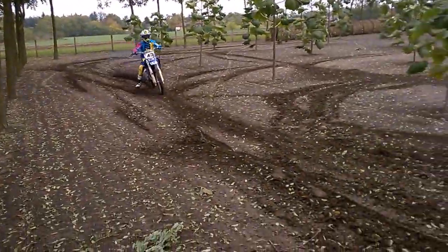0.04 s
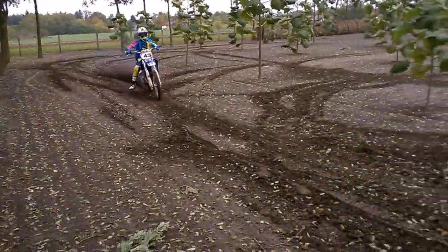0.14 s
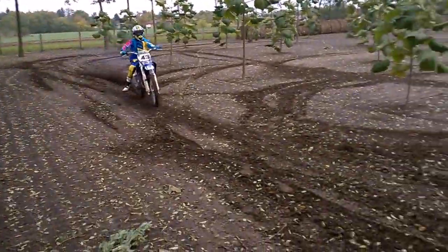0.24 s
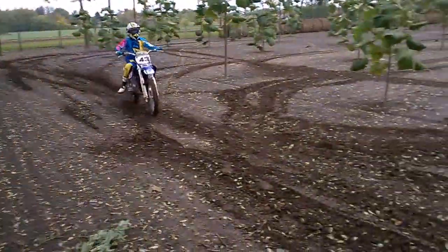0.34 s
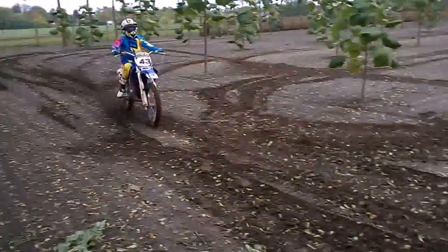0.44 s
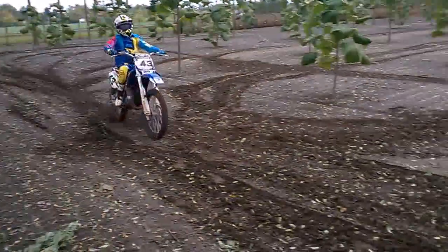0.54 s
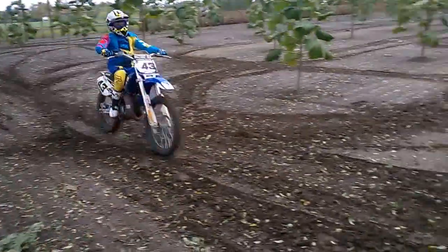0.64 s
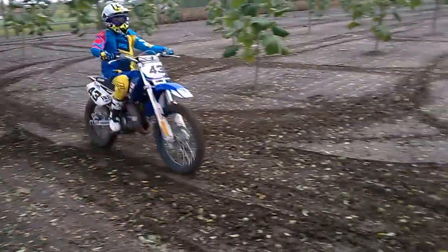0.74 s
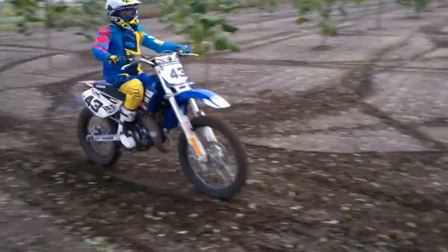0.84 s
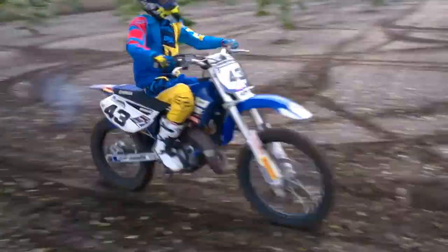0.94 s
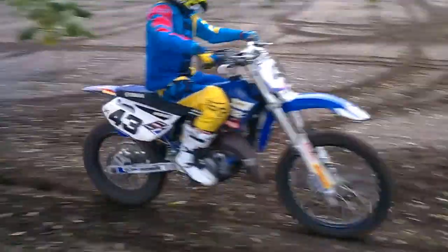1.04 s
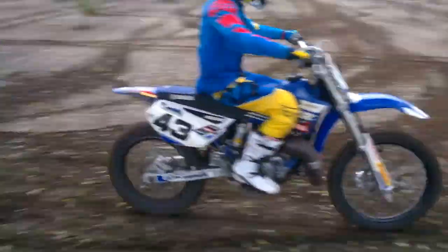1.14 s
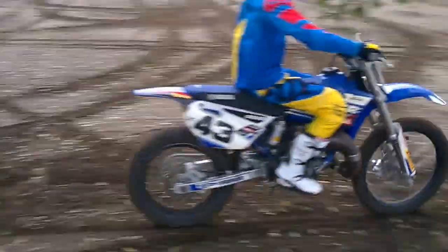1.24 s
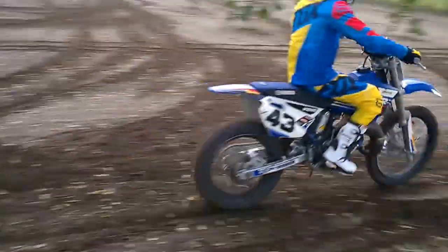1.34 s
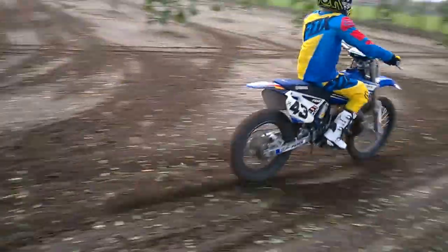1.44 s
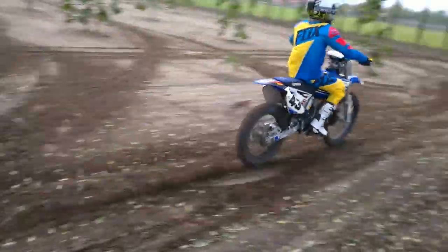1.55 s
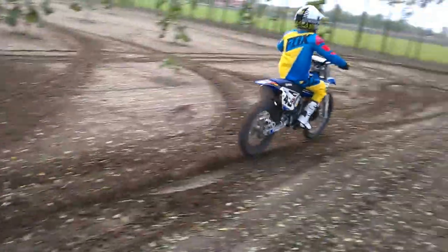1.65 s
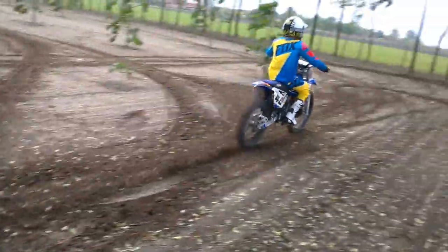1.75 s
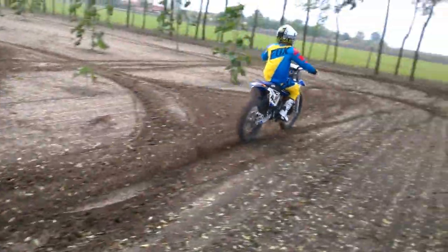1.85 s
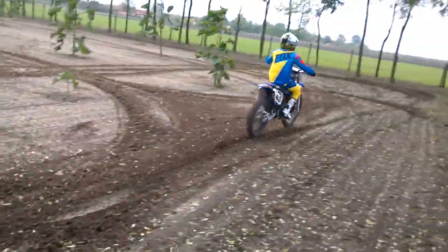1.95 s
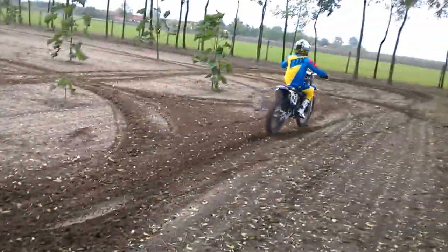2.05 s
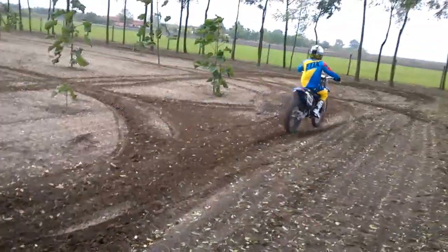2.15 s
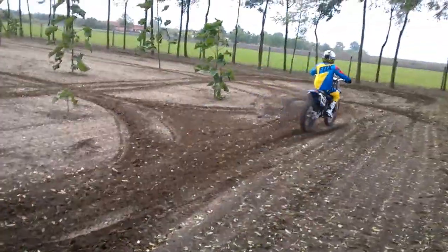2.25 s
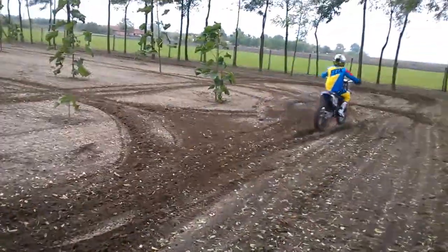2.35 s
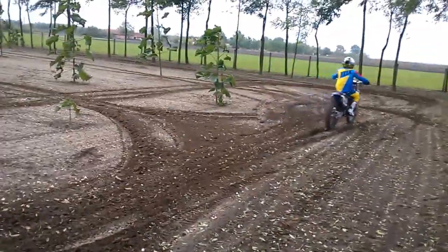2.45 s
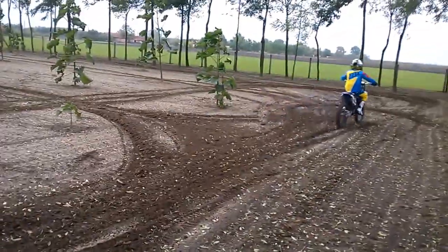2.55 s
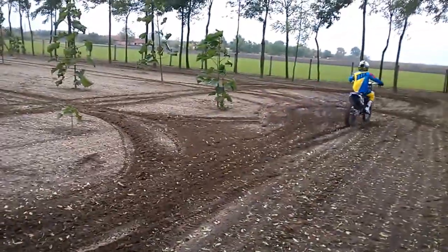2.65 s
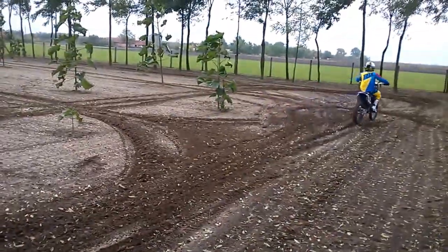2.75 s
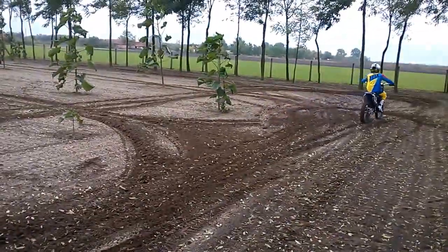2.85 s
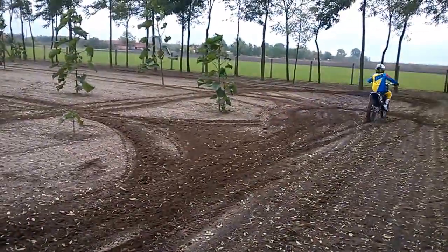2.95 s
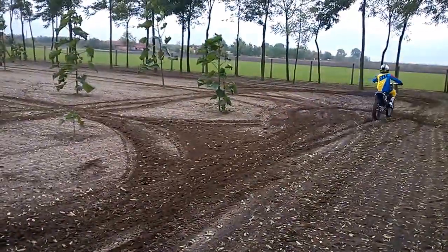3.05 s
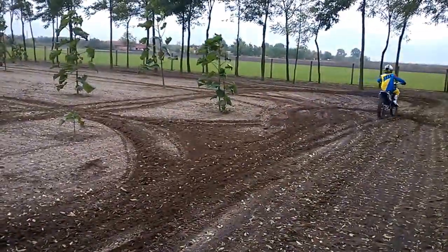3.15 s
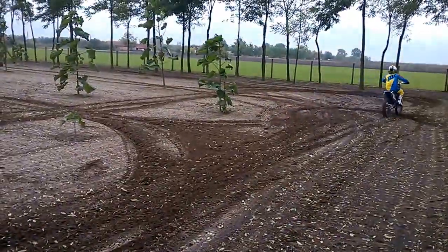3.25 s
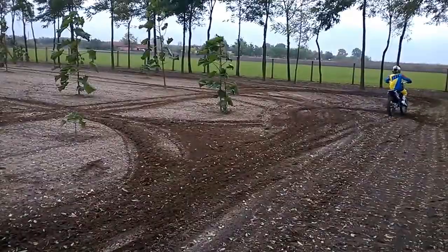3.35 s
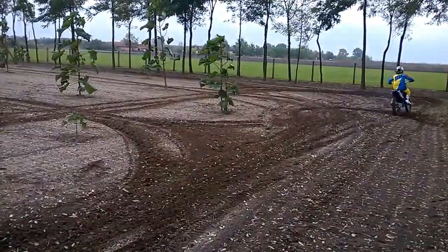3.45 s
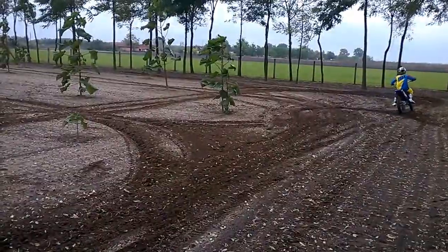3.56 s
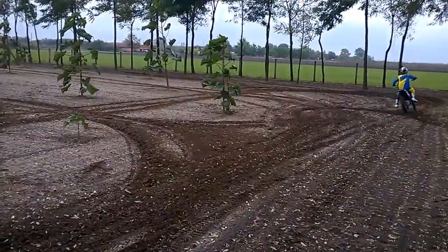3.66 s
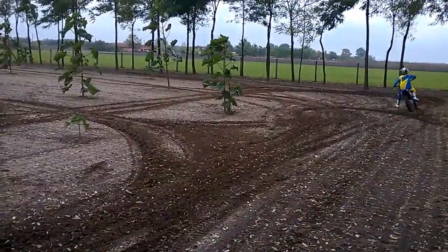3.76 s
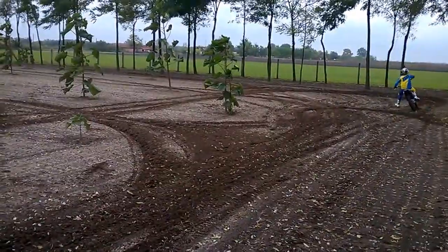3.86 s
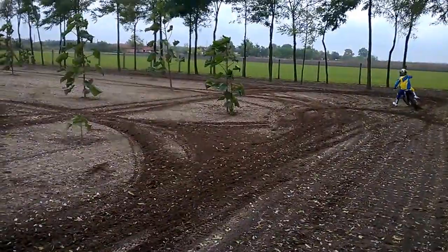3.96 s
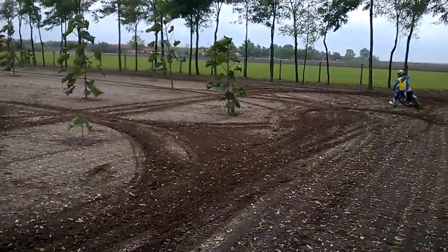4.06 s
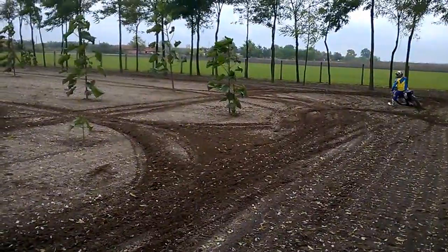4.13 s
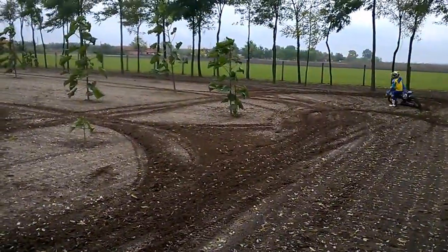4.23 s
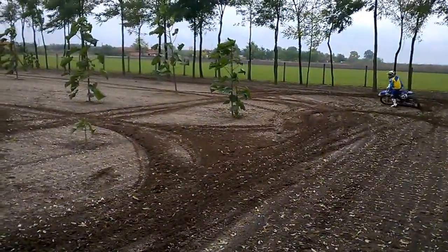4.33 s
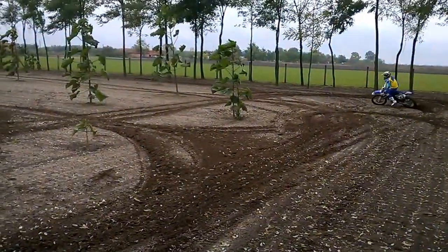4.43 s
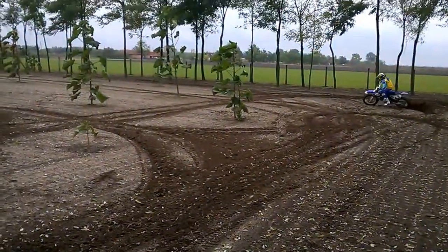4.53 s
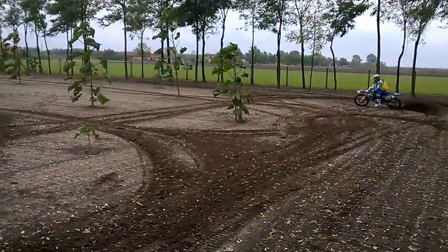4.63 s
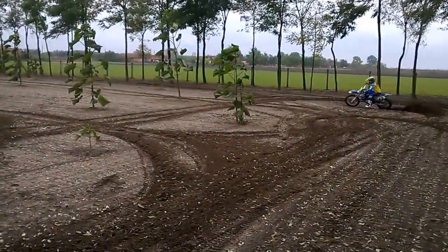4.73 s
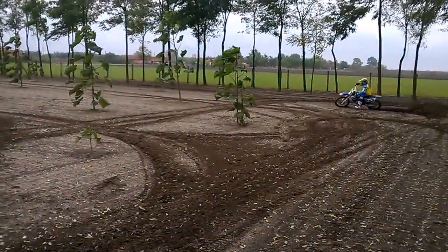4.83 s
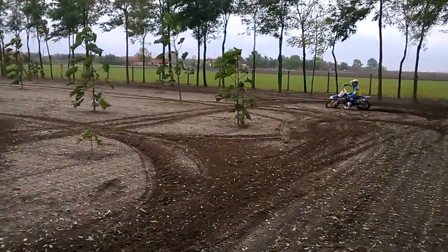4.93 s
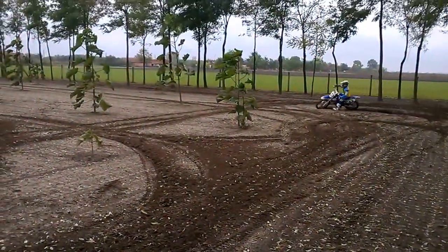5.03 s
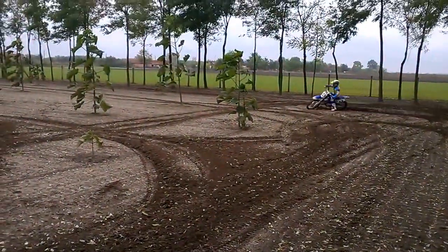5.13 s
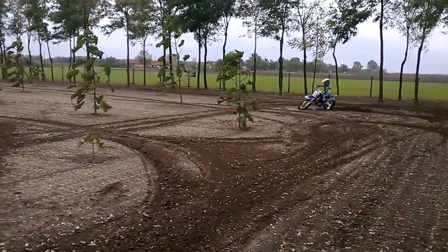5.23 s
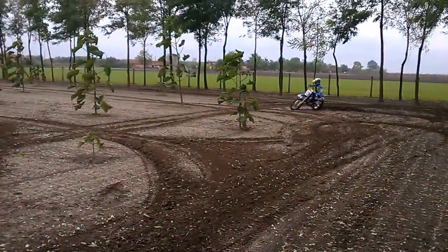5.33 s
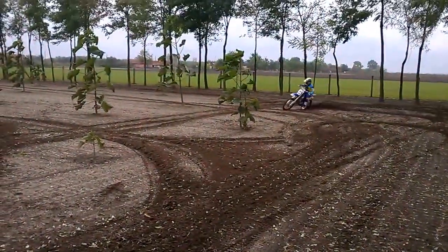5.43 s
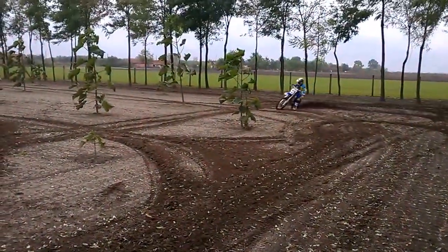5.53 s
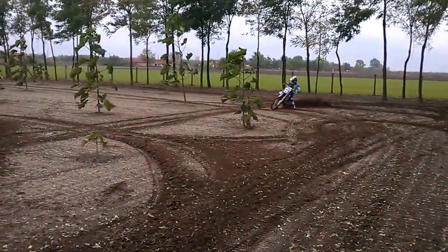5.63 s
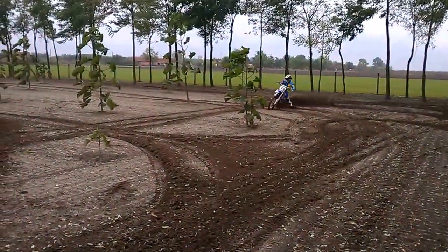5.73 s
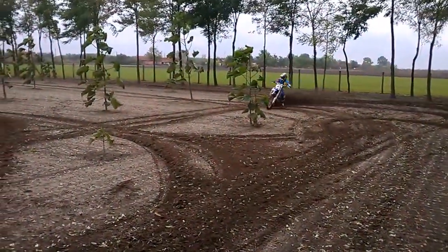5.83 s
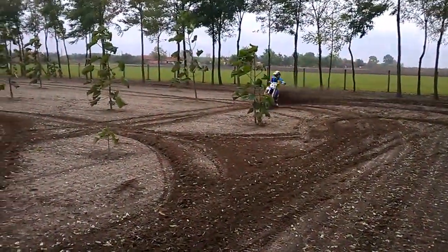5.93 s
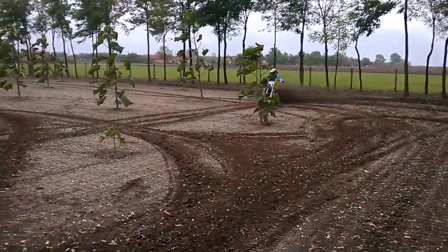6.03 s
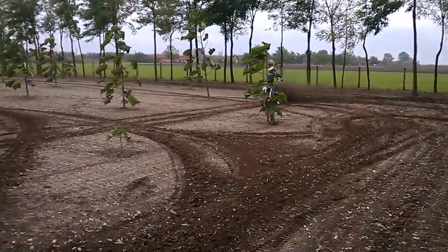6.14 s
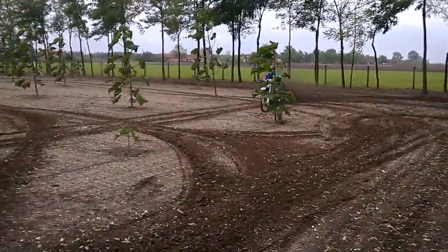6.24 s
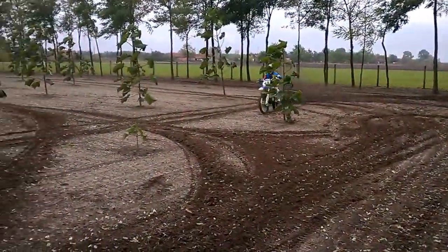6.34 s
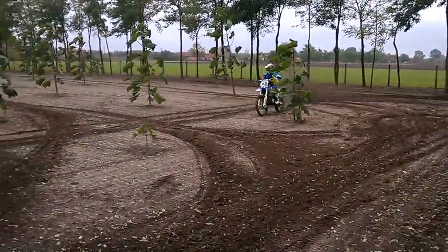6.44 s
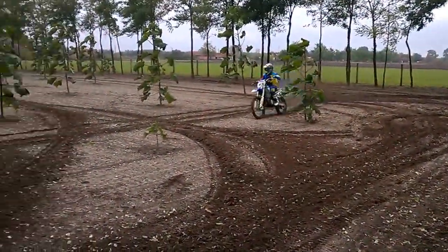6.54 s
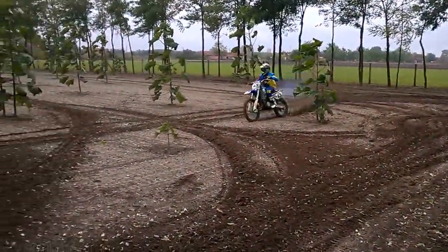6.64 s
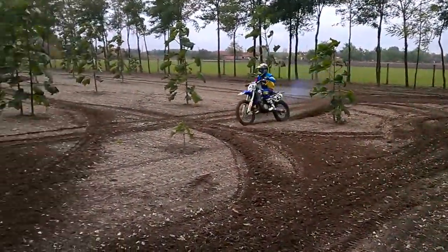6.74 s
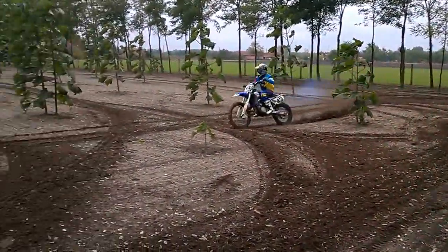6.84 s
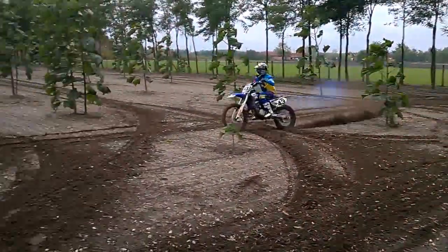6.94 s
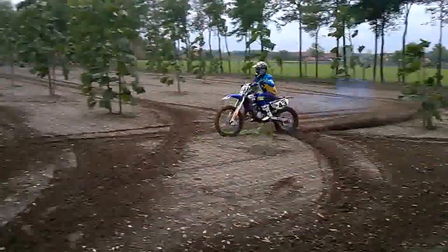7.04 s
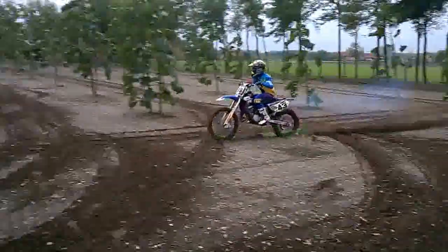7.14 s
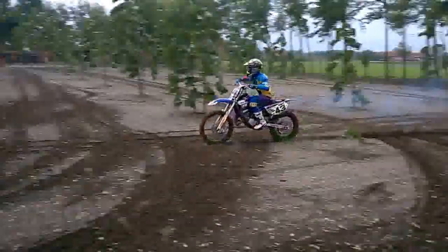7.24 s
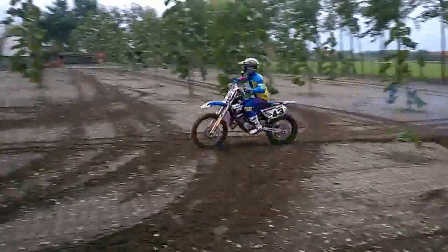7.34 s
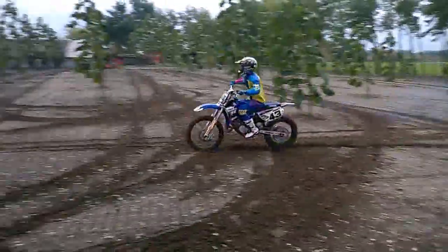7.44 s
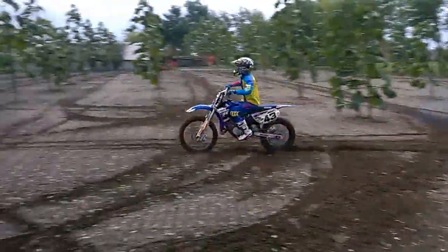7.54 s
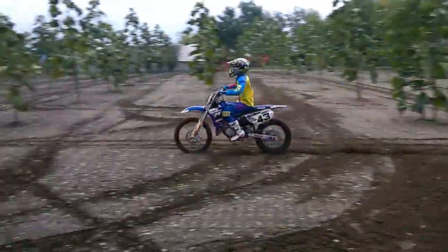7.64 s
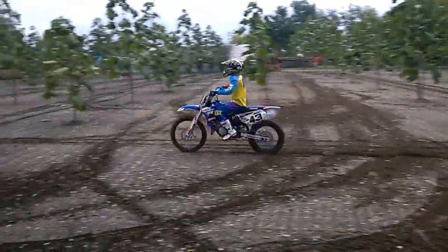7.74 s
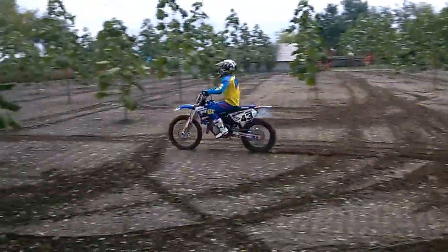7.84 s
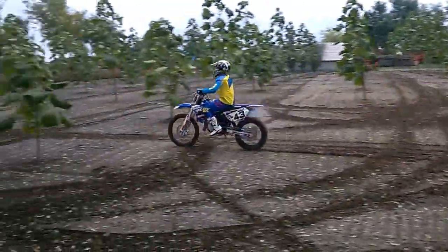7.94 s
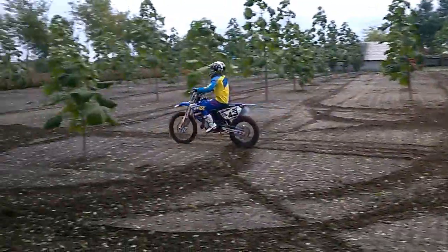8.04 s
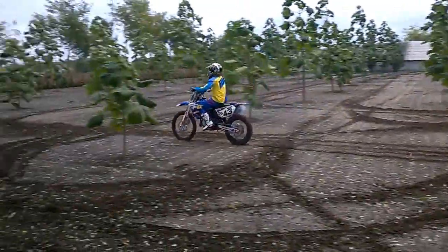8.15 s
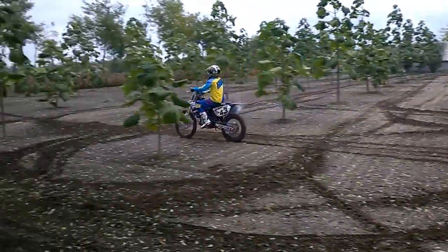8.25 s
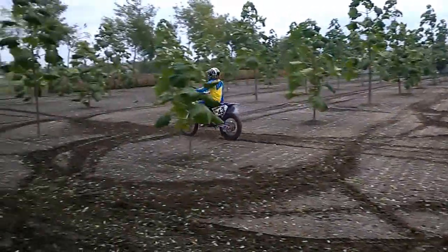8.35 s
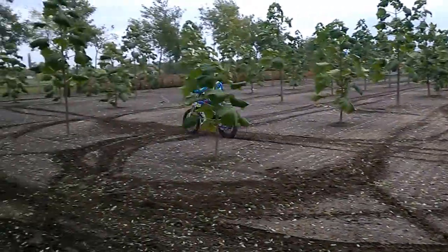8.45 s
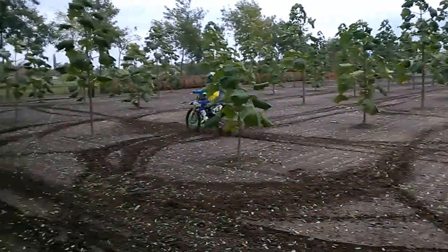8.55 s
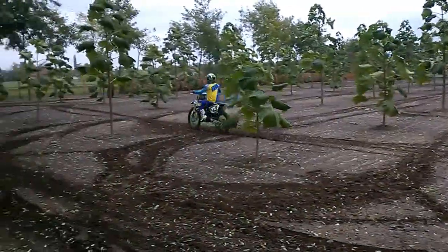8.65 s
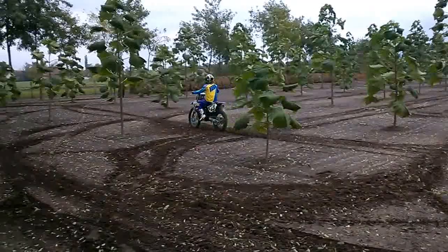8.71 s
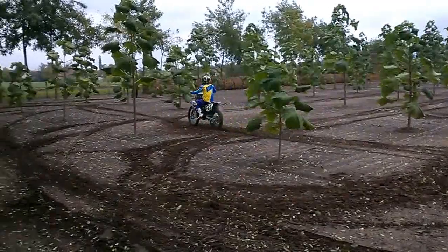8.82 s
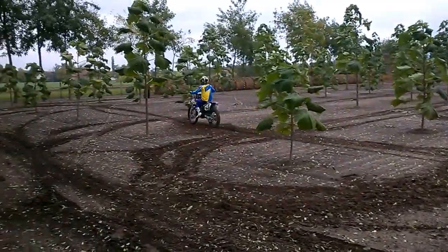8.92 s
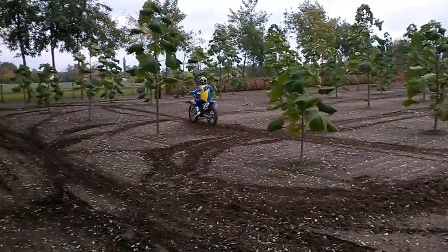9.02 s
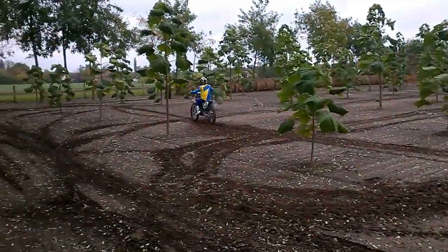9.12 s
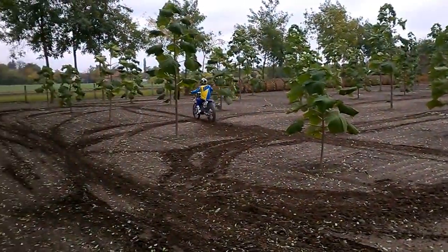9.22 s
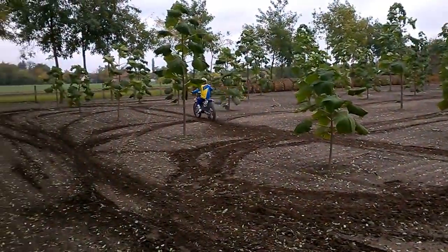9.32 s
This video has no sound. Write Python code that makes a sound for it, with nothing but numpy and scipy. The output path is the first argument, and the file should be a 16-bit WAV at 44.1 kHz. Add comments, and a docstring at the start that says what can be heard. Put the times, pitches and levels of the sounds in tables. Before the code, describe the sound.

A small two-stroke dirt bike screams up, drops its revs and passes close, coasts popping into a far bend, then revs hard and coasts off again, wind thumping.

```python
"""A small two-stroke dirt bike passes close, brakes into a far bend, accelerates back and coasts away among young trees.
One firing per crank turn makes pulses that boom in the tuned pipe and bark from the silencer, with puffs of noise.
Off throttle the engine pumps air, metallic resonances ring, and lone firings pop.
Trunks and ground add a dull scattered tail; wind on the microphone is shaped noise with sharp pressure swings."""
import sys
import numpy as np
from scipy import signal
from scipy.fft import rfft, irfft, next_fast_len
from scipy.io import wavfile
from scipy.ndimage import uniform_filter1d, map_coordinates

SR = 44100
rng = np.random.default_rng(int(sys.argv[2]) if len(sys.argv) > 2 else 0)


def transcribe(u):
    """Save the signal u as a 16-bit wav file named by the first command-line argument.

    u: samples, shape (n,) or (channels, n), limited to [-1, 1]; the rate is SR.
    q: integer samples, one column per channel.
    """
    v = np.clip(np.atleast_2d(u).T, -1, 1)
    q = np.round(v * 32767).astype(np.int16)
    wavfile.write(sys.argv[1], SR, q)


N = 413658


def amp(db):
    """Level in decibels to linear amplitude ratio."""
    return 10 ** (np.asarray(db) / 20)


def even(x, span=0.11):
    """Level normalization: divide by a running rms over about span seconds, smoothed twice."""
    size = int(span * SR)
    power = uniform_filter1d(uniform_filter1d(x * x, size), size)
    return x / np.sqrt(np.abs(power) + 1e-20)


def along(points, hz):
    """Interpolation of (frequency_hz, value) points on a logarithmic frequency axis."""
    f, v = np.transpose(points)
    return np.interp(np.log(hz + 1), np.log(f + 1), v)


def curves(rows):
    """Linear interpolation in time: one sample-rate curve for each column after the time."""
    s, *cols = np.transpose(rows)
    return [np.interp(np.arange(N) / SR, s, c) for c in cols]


def wobble(rate):
    """Band-limited random fluctuation: a smooth curve through rate random knots a second."""
    knots = rng.standard_normal(int(N * rate / SR) + 4)
    return map_coordinates(knots, [np.arange(N) * rate / SR])


def swells(rows):
    """Superposition of Gaussian humps given as (centre_s, half_length_s, height)."""
    t = np.arange(N) / SR
    return sum(height * np.exp(-((t - s) / half_s) ** 2) for s, half_s, height in rows)


def filtered(x, response):
    """Linear filtering: multiply the spectrum by a response given as a function of frequency."""
    m = next_fast_len(N + SR // 2)
    return irfft(rfft(x, m) * response(np.fft.rfftfreq(m, 1 / SR)), m)[:N]


def ringing(x, modes, low_hz, high_hz):
    """Modal superposition: causal second-order resonances of alternating sign inside a steep band."""
    def body(f):
        total = 0
        for k, (centre, width, db) in enumerate(modes):
            resonance = 1j * f * width / (centre * centre - f * f + 1j * f * width)
            total = total + (-1) ** k * amp(db) * resonance
        return total

    band = signal.butter(3, [low_hz, high_hz], "bandpass", fs=SR, output="sos")
    return signal.sosfilt(band, filtered(x, body))


def pulses(at, size):
    """Band-limited impulses: windowed sinc functions at fractional sample positions."""
    tap = np.floor(at)[:, None] + np.arange(-7, 9)
    offset = tap - at[:, None]
    shape = np.sinc(offset) * np.cos(np.pi * offset / 16) ** 2
    index = np.clip(tap, 0, N).astype(int)
    return np.bincount(index.ravel(), (shape * size[:, None]).ravel(), N + 1)[:N]


def throttle():
    """Gas-flow transient: each opening ramps up and holds, then cuts fast with a slower exponential remainder."""
    # throttle openings: open_s, shut_s, rise_s, ragged_burning (0-1)
    openings = [(-0.1, 0.181, .02, 0.14), (0.941, 1.021, 0.023, 1), (3.987, 7.268, 0.39, 0.04)]
    shut_s, linger_s, linger_share = 0.011, 0.091, 0.44  # two decay constants and the slow share
    t = np.arange(N) / SR
    gas, ragged = np.zeros((2, N))
    for open_s, close_s, rise_s, rough in openings:
        rise = np.clip((t - open_s) / rise_s, 0, 1) ** 0.41
        after = np.maximum(t - close_s, 0)
        fast, slow = np.exp(-after / shut_s), np.exp(-after / linger_s)
        gas += rise * ((1 - linger_share) * fast + linger_share * slow)
        ragged += rough * rise * fast
    return np.clip([gas, ragged], 0, 1)


def puffs(turns):
    """Turbulence modulated by port flow: noise surges as the port opens, then tails off within the turn."""
    port = 2.8 + np.exp(-(turns % 1) / 1.1)
    return even(port * rng.standard_normal(N))


def mixed(rough, train, turns):
    """Power-conserving mixture of a periodic pulse train and puffs, rough being the noise share."""
    return np.sqrt(1 - rough) * train + np.sqrt(rough) * puffs(turns)


def smeared(x, delay_s):
    """Dispersion: waves running to and fro in the pipe hold each frequency back by its own few milliseconds."""
    knots = rng.uniform(0, delay_s, 160)

    def lag(hz):  # phase lag in cycles: the integral of group delay
        delay = np.interp(hz, np.linspace(0, SR / 2, len(knots)), knots)
        return np.cumsum(delay) * hz[1]

    return filtered(x, lambda hz: np.exp(-2j * np.pi * lag(hz)))


def pipe_tones(steady, db):
    """Tuned-pipe resonance: firing pulses excite a low boom and a group of overtones."""
    # pipe resonances, low and upper: centre_hz, width_hz, relative_level_db
    low_modes = [(218.6, 47, 3), (110, 60, -31)]
    upper_modes = [(373, 466, 5), (447, 82, 11), (550, 30, 3)]
    # brief booms as the bike passes: centre_s, half_length_s, added_db
    boom_humps = [(0.925, 0.033, 28.5), (1.13, 0.063, 16.5)]
    boom = even(ringing(steady, low_modes, low_hz=93.22, high_hz=280))
    overtones = even(ringing(steady, upper_modes, low_hz=300, high_hz=547))
    boom_gain = amp(db["boom"] + swells(boom_humps))
    return boom_gain * boom + amp(db["overtones"] + 1.73 * wobble(13)) * overtones


def case_hum(drive, db):
    """Structural resonance: the engine case hums under the firing pulses and noise."""
    # case resonances: centre_hz, width_hz, relative_level_db
    case_modes = [(648, 31, 0.5), (802, 44, 0), (1230, 610, -3)]
    return amp(db["hum"]) * even(ringing(drive, case_modes, low_hz=530, high_hz=1370))


def silencer_bark(blast, db):
    """Acoustic cavity resonance: one exhaust blast excites the silencer low and its stinger high."""
    # silencer and stinger resonances: centre_hz, width_hz, relative_level_db
    silencer_modes = [(1306, 190, 0), (1613, 227, 3)]
    stinger_modes = [(1986, 397, -0.5), (2600, 820, -7.5)]
    low = amp(db["low"]) * even(ringing(blast, silencer_modes, low_hz=1330, high_hz=1900))
    high = amp(db["high"]) * even(ringing(blast, stinger_modes, low_hz=1647, high_hz=3440))
    return low + high


def fin_rasp(beats, db, turns):
    """Forced vibration: turbulent puffs with a trace of the pulse train rattle the fin resonances."""
    # fin resonances: centre_hz, width_hz, relative_level_db
    fin_modes = [(3140, 950, 1.5), (4390, 1330, 0.5), (5050, 970, 1), (7100, 1100, 1), (6300, 560, -40)]
    drive = 0.043 * beats + puffs(turns)
    return amp(db["rasp"]) * even(ringing(drive, fin_modes, low_hz=2690, high_hz=8140))


def gas_hiss(db, turns):
    """Broadband turbulent radiation: puffs of gas are shaped into a hiss and a higher sizzle."""
    # noise spectra: frequency_hz, relative_level_db (per Hz)
    hiss_spectrum = [(4470, -2.5), (7600, -2), (8190, -5), (9260, -1.5), (10800, -9.5), (14000, -16),
                     (22000, -120)]
    sizzle_spectrum = [(6180, -42), (10500, -11.5), (12700, 0), (13800, -9), (15600, -1.5)]
    hiss = even(filtered(puffs(turns), lambda hz: amp(along(hiss_spectrum, hz))))
    sizzle = even(filtered(puffs(turns), lambda hz: amp(along(sizzle_spectrum, hz))))
    return amp(db["hiss"]) * hiss + amp(db["sizzle"]) * sizzle


def coasting_rings(knocks, controls, turns):
    """Narrow-band resonance: pulses and puffs excite separate rings that stand out as the engine coasts."""
    # ring resonances: centre_hz, width_hz, noise_share (0-1)
    ring_modes = [(598, 37, 0.07), (2906, 180, 0.32), (3800, 430, 0.95), (5340, 210, 0.8),
                  (8200, 1300, 0.66)]
    # level laws, a row a ring: coasting_db, throttle_adds_db, db_per_loudness_db, db_per_speed_octave,
    # share_of_treble_level, ragged_adds_db
    ring_laws = [(-57.5, -19, 0.93, .1, .01, 37), (-67.5, -22, 0.77, .1, 0.49, 26),
                 (-59, -4, 1.206, .1, 0.33, 13), (-65.5, -17.5, 1.37, .1, 0.11, 37),
                 (-78, -32, 0.92, .1, 1.2, 30)]
    # moments when a ring stands out, a list a ring: centre_s, half_length_s, added_db
    ring_humps = [
        [(1.19, .075, 14.5), (1.5, 0.1, 7.5), (1.95, 0.21, 2), (7.95, 0.16, -1)],
        [(1.2, .2, 12), (1.72, .17, 20.5), (2.03, 0.19, 16), (2.8, 0.22, 12)],
        [(0.9, 0.075, 0), (1.14, 0.13, 9)],
        [],
        [(1.45, 0.059, 1)],
    ]
    total = np.zeros(N)
    for law, humps, (hz, width, rough) in zip(ring_laws, ring_humps, ring_modes):
        drive = mixed(np.clip(rough, 0, 1), knocks, turns)
        ring = ringing(drive, [(hz, width, 0)], low_hz=0.682 * hz, high_hz=1.415 * hz)
        total += amp(np.dot(law, controls) + swells(humps)) * even(ring, span=1.0)
    return total


def patchy(x, depth_db):
    """Interference: ground and trunk echoes make patches of the spectrum swell and fade, drawn as a random field."""
    z = signal.stft(x, nperseg=1024)[2]
    field = uniform_filter1d(rng.standard_normal(z.shape), size=4, axis=0)
    field = uniform_filter1d(uniform_filter1d(field, size=9, axis=1), size=5, axis=1)
    return signal.istft(z * amp(depth_db * field / field.std()), nperseg=1024)[1][:N]


def engine():
    """Source-filter principle: each crank turn sends a pulse and a puff through pipe, case, silencer and fins."""
    # mean crank speed: time_s, turns_per_s_hz
    crank_speed = [(0.0, 211.6), (0.15, 216.2), (0.21, 208.6), (0.29, 167.4), (0.36, 148.3), (0.57, 127.3),
                   (0.68, 135), (0.92, 127.3), (1.0, 160), (1.07, 141.5), (1.2, 127.4), (1.41, 111),
                   (1.67, 96.14), (1.9, 89.5), (2.19, 81.54), (2.62, 69.1), (2.95, 69.54), (3.65, 58.84),
                   (3.9, 59.2), (4.13, 70.8), (4.23, 84.7), (4.36, 94.5), (4.46, 108.1), (4.62, 112),
                   (4.73, 108.9), (4.81, 114.7), (4.89, 115.2), (4.95, 109.4), (5.04, 110.7), (5.09, 117.5),
                   (5.22, 121.1), (5.28, 118.2), (5.41, 137.3), (5.56, 191.9), (5.72, 185.1), (5.88, 205.6),
                   (5.95, 200), (6.01, 209.7), (6.22, 206.2), (6.27, 216.8), (6.4, 218.3), (6.8, 218.6),
                   (7.28, 220.2), (7.37, 180), (7.44, 154.9), (7.55, 138.7), (7.76, 122.2), (8.07, 122.2),
                   (8.31, 116), (8.7, 99.5), (9.04, 82.5), (9.38, 70.1)]
    # the bike as it nears, turns and leaves: time_s, loudness_db, treble_over_usual_share_db
    ride = [(0.0, 7, -2), (0.29, 0, 5), (0.55, 4.5, -0.5), (0.86, 10, -1), (1.07, 8.5, 4), (1.17, 13, 0),
            (1.36, 10.5, 0), (1.46, 10.5, 7.5), (1.56, 4.5, 2), (1.91, -1.5, 2.5), (2.06, -4.5, 3),
            (2.24, -6, 2), (2.62, -9, 4.5), (3.32, -8, 6.5), (3.63, -13, 11.5), (3.94, -13, 11.5),
            (4.2, -8.5, 5), (4.49, -5.5, 3), (5.07, -5.5, 3), (5.3, -7.5, 6), (5.5, -2.5, 4), (5.9, 0, 2),
            (6.3, 1, 1), (6.75, 5, 0.5), (7.1, 6.5, 0), (7.27, 7, 1.5), (7.5, 4, 0.5), (7.63, 3.5, 0),
            (8.07, 4, -4), (8.5, -3, 3), (8.9, -6.5, 1.5), (9.38, -9.5, 7.5)]
    # slow drift of three bands: time_s, pipe_overtones_db, case_hum_db, low_bark_db
    drift = [(0.0, -1, 3, -1), (0.3, 4.5, 2.5, 2), (0.73, -3, 2, 2), (1.1, -1, 0, 0), (2.0, -2, 4.5, -5),
             (2.5, -4, -8.5, -12), (3.9, -3.5, 0, -9.5), (4.6, 2, 2.5, -8), (5.35, 5, 3.5, -1.5),
             (5.6, 2.5, 2.5, -4), (6.0, -3, 3, -1.5), (6.85, -5.5, -3.5, -2), (7.05, 0.5, -0.5, 4),
             (7.25, 3.5, -1.5, 6), (7.5, 10, 0.5, -3), (7.7, -14, -3.5, -1.5), (8.1, -4, -3, 3),
             (8.8, -13, -1, -5.5), (9.38, -5.5, 7, 0)]
    # level law of each voice: coasting_db, throttle_adds_db, db_per_loudness_db, db_per_speed_octave,
    # share_of_treble_level, ragged_adds_db
    voice_laws = dict(boom=(-63.5, 38.5, 0.65, 0.5, -0.42, -16), overtones=(-65.5, 32, 1.3, -12, 0.35, -22),
                  hum=(-56, 13, 1.04, -2, -0.52, 10), low=(-54, 19.5, 0.81, -5.3, 0.2, 1.5),
                  high=(-53.5, 18.5, 1.27, -3.5, .01, 1), rasp=(-67, 20.5, 1.55, 2.5, 1.91, -2),
                  hiss=(-64.5, 17, 1.5, 4, 1.22, 4), sizzle=(-88.5, 26.5, 1.66, 13, 2.5, 7))
    mid_hz = 128  # speed at which the octave term is zero
    smooth_hz, lumpy_hz = 110, 70  # coasting burns turn noisy below the first speed, fully at the second
    # noise share 0-1: coasting, pulling, lugging, ragged
    hum_noise, bark_noise = (.07, .08, .65, .7), (.17, .12, .85, .8)

    speed_hz, = curves(crank_speed)
    turns = np.cumsum(speed_hz * (1 + .005 * wobble(30))) / SR  # uneven burns make the speed waver
    gas, ragged = throttle()
    loud_db, treble_db = curves(ride)
    controls = np.array([np.ones(N), gas, loud_db, np.log2(speed_hz / mid_hz), treble_db, ragged])
    db = {name: np.dot(law, controls) for name, law in voice_laws.items()}
    for name, drift_db in zip(("overtones", "hum", "low"), curves(drift)):
        db[name] = db[name] + drift_db

    lugging = (1 - gas) * np.clip((smooth_hz - speed_hz) / (smooth_hz - lumpy_hz), 0, 1)

    def roughness(coast, pull, lug, rag):
        share = coast + (pull - coast) * gas + (lug - coast) * lugging + (rag - pull) * ragged
        return np.clip(share, 0, 1)

    at = np.interp(np.arange(1, int(turns[-1])), turns, np.arange(N))  # one firing a turn
    size_scatter, time_scatter = rng.standard_normal((2, len(at)))
    steady = pulses(at, amp(0.51 * size_scatter))
    # port opening jitters by 30 microseconds rms
    knocks = even(pulses(at + .00003 * SR * time_scatter, amp(0.4 * size_scatter)))
    beats = smeared(knocks, delay_s=.0055)

    tones = pipe_tones(steady, db)
    hum = case_hum(mixed(roughness(*hum_noise), beats, turns), db)
    bark = silencer_bark(mixed(roughness(*bark_noise), beats, turns), db)
    rasp = fin_rasp(beats, db, turns)
    rings = coasting_rings(knocks, controls, turns)
    scattered = patchy(hum + bark + rasp + gas_hiss(db, turns), depth_db=2.6)
    return tones + rings + amp(1.03 * wobble(6)) * scattered


def trees(x):
    """Diffuse scattering: trunks and ground give a dull tail whose decay time depends on frequency."""
    # scattered tail: frequency_hz, t60_s
    decay = [(250, 0.37), (700, 0.58), (2000, 1), (10000, 0.022)]
    hz, t, z = signal.stft(rng.standard_normal(SR // 2), SR, nperseg=256)
    tail = signal.istft(z * amp(-60 * t / along(decay, hz)[:, None]), SR, nperseg=256)[1]
    delayed = np.pad(x, (500, 0))  # in samples
    return signal.fftconvolve(delayed, tail / np.linalg.norm(tail))[:N]


def wind():
    """Turbulent pressure fluctuation: eddies push the diaphragm in lumps, hard gusts in a few sharp swings."""
    # rumble before flutter and gusts: time_s, level_db
    rumble_level = [(0.0, -50), (0.12, -50), (0.3, -29), (0.7, -43.5), (1.0, -39), (1.12, -40), (1.25, -43),
                    (1.45, -33.5), (2.0, -42), (2.38, -42.5), (2.52, -53.5), (2.75, -39.5), (3.5, -40),
                    (4.2, -38), (4.6, -33), (5.4, -41), (5.85, -34.5), (6.9, -44.5), (7.23, -37),
                    (7.52, -50), (7.75, -47.5), (8.6, -49), (9.25, -39.5), (9.38, -40)]
    # rumble spectrum: frequency_hz, relative_level_db (per Hz)
    rumble_spectrum = [(12, -42), (20, -8.5), (48, 2), (97, -1.5), (167, -8), (215, -12), (267, -17.5),
                       (409, -23.5), (600, -39), (780, -38), (1320, -120)]
    # hard gust thumps: time_s, nominal_level_db (gains follow)
    thumps = [(0.224, -24.5), (0.407, -17), (0.459, -20), (0.55, -30), (0.603, -30.5), (0.725, -23.5),
              (0.807, -23), (1.356, -26), (1.454, -21), (1.54, -19.5), (1.73, -35), (2.079, -36.5),
              (2.199, -44.5), (2.648, -13.5), (2.929, -36), (3.075, -24.5), (3.348, -30), (3.475, -34),
              (3.707, -35), (3.912, -44), (4.059, -25.5), (4.689, -21), (4.95, -28), (5.249, -21),
              (5.699, -25.5), (6.41, -24), (8.092, -46), (8.164, -31.5), (8.206, -34), (8.574, -39),
              (8.668, -35.5), (8.786, -34.5), (8.867, -31.5), (8.918, -21), (8.945, -25), (9.022, -29.5),
              (9.075, -25.5), (9.216, -27.5), (9.26, -22.5)]
    swell_db, swell_s = -17.5, 0.038  # the rumble swells around each thump
    lumps = amp(3.5 * wobble(30) + 2.4 * wobble(90)) * rng.standard_normal(N)
    gusts = swells([(s, swell_s, amp(db + swell_db)) for s, db in thumps])
    level = amp(curves(rumble_level)[0] + 2.47 * wobble(11)) + gusts
    rumble = level * even(filtered(lumps, lambda hz: amp(along(rumble_spectrum, hz))), span=0.074)

    swings, t = np.zeros(N + SR), np.arange(SR // 16) / SR
    lead_s = .006  # room for the rise ahead of the thump time
    for s, db in thumps:
        sign = rng.choice([-1, 1])
        start = round((s - lead_s) * SR)
        # each swing: extra delay (s), relative size, width (s)
        draws = rng.uniform([0, .55, .0012], [.003, 1, .0024], (3, 3))
        for k, (late, size, width) in enumerate(draws):
            u = np.abs(t - k * 0.00521 - late - lead_s) / width
            shape = (1 - u ** 0.78) * np.exp(-u ** 1.5)
            push = sign * (-1) ** k  # push and pull alternate
            swings[start:][:len(t)] += amp(db + 3.5) * push * size * shape
    return rumble + filtered(swings[:N], lambda hz: 1 / (1 + (hz / 800) ** 4))


def pops():
    """Impulsive excitation and reflection: a lone firing spits, blows into the tailpipe, returns and trails gas."""
    # lone firings: time_s, nominal_level_db (gains follow), treble_over_level_db
    firings = [(2.6287, -41, -20), (2.6693, -38.5, -8), (2.709, -41.5, -15), (2.7846, -39.5, -12),
               (2.8226, -41, -11), (2.8586, -42, -9), (2.9696, -47, -16), (3.0897, -40.5, -9),
               (3.128, -40.5, -10.5), (3.1647, -42, -11), (3.2032, -46, -8), (3.242, -40.5, -7.5),
               (3.2818, -37.5, -11), (3.3514, -48, -7), (3.391, -46, -5), (3.4683, -51, -23),
               (3.503, -41, -9), (3.5796, -49, -9), (3.6492, -46, -20), (3.684, -32, -11.5),
               (3.765, -35, -7), (3.9115, -52, -4), (3.9805, -41, -13), (4.0152, -39.5, -11),
               (8.329, -33.5, -14), (8.4287, -35, -7), (8.4782, -32, -11), (8.521, -39, -8),
               (8.5701, -37, -5.5), (8.6109, -37, -6), (8.6561, -34, -8), (8.6958, -38, -11),
               (8.7395, -42.5, -2), (8.7853, -33.5, -6.5), (8.8288, -35, -8), (8.8734, -42, -4),
               (8.9169, -34.5, -7), (8.959, -33, -8.5), (9.0005, -35.5, -6.5), (9.0432, -41, -4),
               (9.0828, -37.5, -5), (9.1226, -30.5, -10), (9.1631, -35, -6), (9.2037, -35.5, -8),
               (9.2457, -35.5, -10), (9.283, -30.5, -7.5), (9.3188, -30, -15), (9.3558, -32, -10)]
    # resonances of the tailpipe, its lower mode, the spit side on and tail on: centre_hz, width_hz, relative_level_db
    tailpipe_modes = [(870, 66, -4), (2074, 275, 6), (2760, 460, -13)]
    lower_modes = [(1673, 115, 0)]
    far_modes = [(3420, 860, 8), (4700, 270, -3), (7260, 920, -10), (8550, 460, -1.5)]
    near_modes = [(3363, 550, 5.5), (4580, 380, 5.5), (5730, 870, -8)]
    bend_end_s = 5  # side on in the far bend before this, tail turned to the microphone after
    # mean gains into tailpipe, lower mode and spit (dB): side on, tail on
    far_db, near_db = (1, 11.5, 1), (3.5, -5, 2.5)
    upper, lower, spit = np.zeros((3, N + SR))
    t = np.arange(SR // 8) / SR
    for s, db, treble_db in firings:
        gas = amp(-60 * t / 0.069) * rng.standard_normal((3, len(t)))
        gas[:, 0] = 4  # the firing
        gas[:, round(.0065 * SR)] = -3  # its inverted return along the pipe
        colour_db = db + rng.normal(far_db if s < bend_end_s else near_db, (1.1, 3.5, 1.1))
        here = np.arange(len(t)) + round(s * SR)
        upper[here + 40] += amp(colour_db[0]) * gas[0]
        lower[here + 40] += amp(colour_db[1]) * gas[1]
        spit[here - 60] += amp(colour_db[2] + treble_db) * gas[2]
    pipe = ringing(upper[:N], tailpipe_modes, low_hz=676, high_hz=3500)
    pipe += ringing(lower[:N], lower_modes, low_hz=1210, high_hz=2320)
    far = np.arange(N) < bend_end_s * SR
    for part, modes in ((far, far_modes), (~far, near_modes)):
        pipe += ringing(spit[:N] * part, modes, low_hz=2880, high_hz=9650)
    return pipe


def scene():
    """Superposition of the bike, its scattered tail and the wind."""
    bike = engine() + pops()
    tail_db = -16
    return (bike + amp(tail_db) * trees(bike) + wind())[None]


def record(dry):
    """Band limitation: the response falls linearly to zero over the last 80 Hz below the upper limit."""
    top_hz = 15710
    return filtered(dry[0], lambda hz: np.clip((top_hz - hz) / 80, 0, 1))[None]


dry = scene()
out = record(dry)
transcribe(out)
```